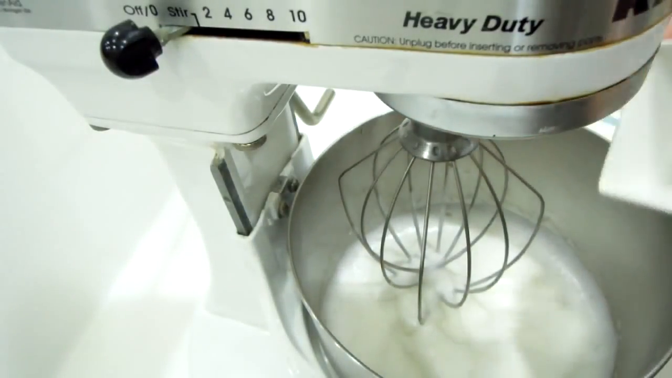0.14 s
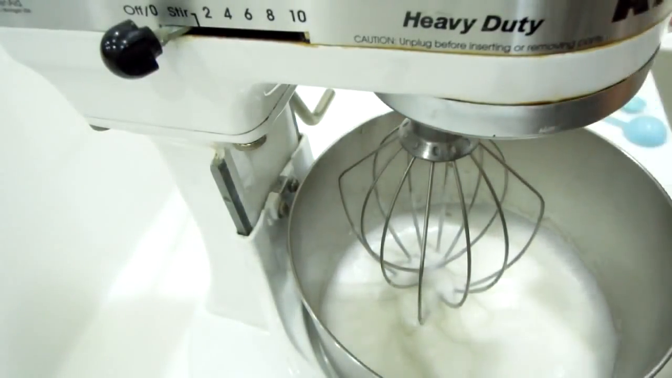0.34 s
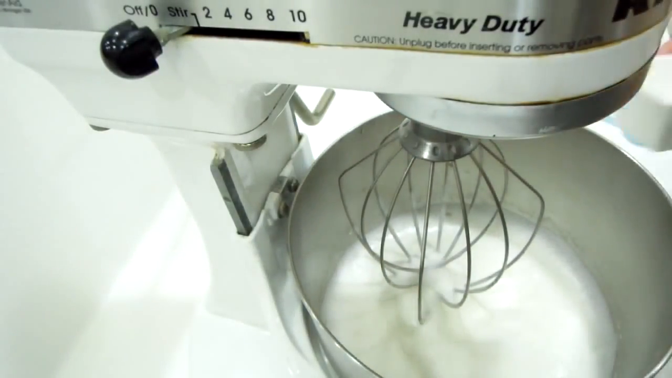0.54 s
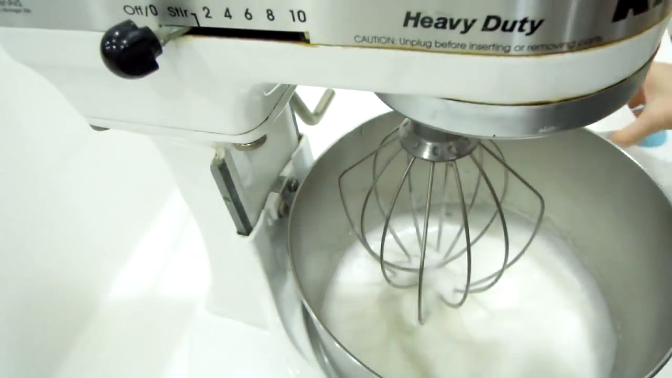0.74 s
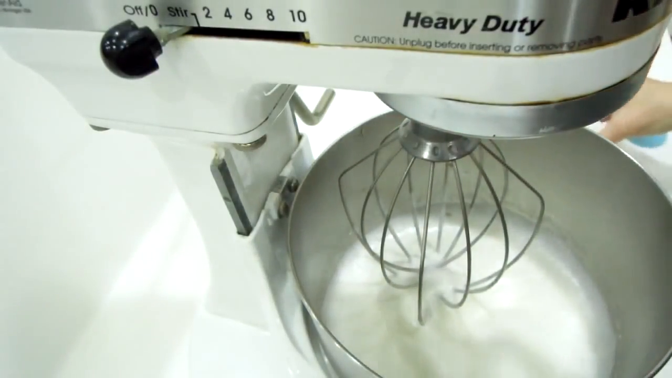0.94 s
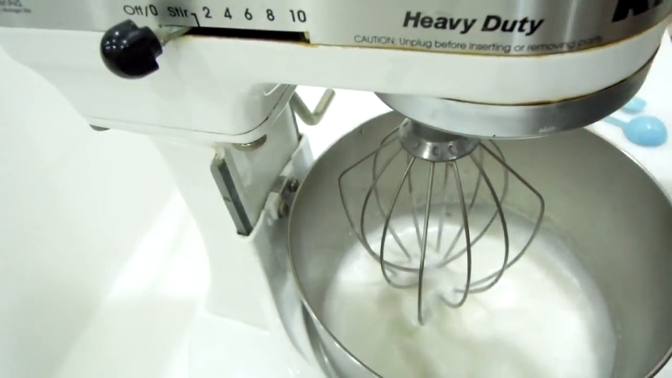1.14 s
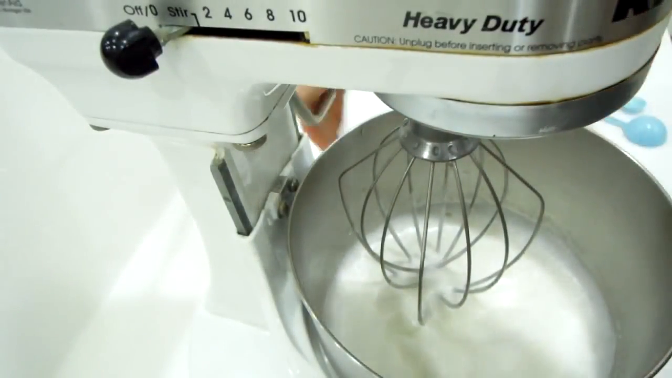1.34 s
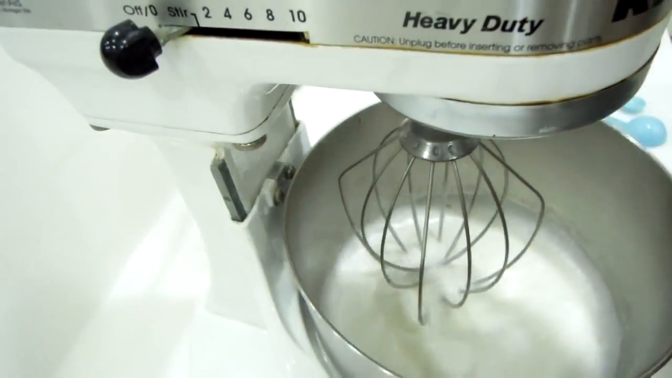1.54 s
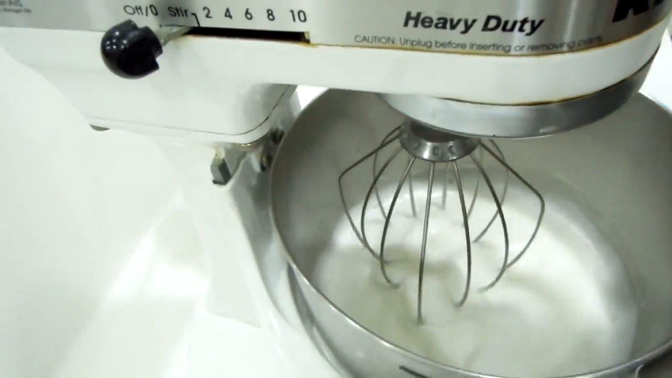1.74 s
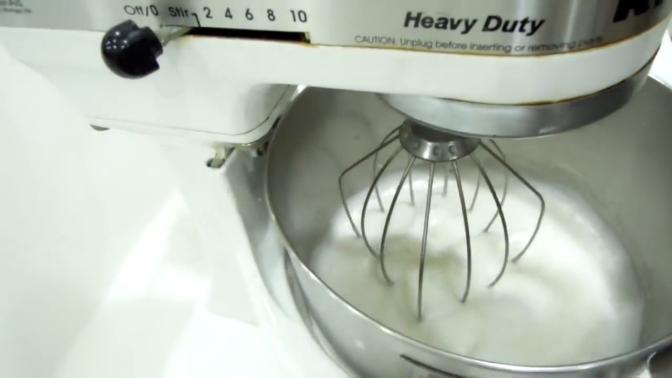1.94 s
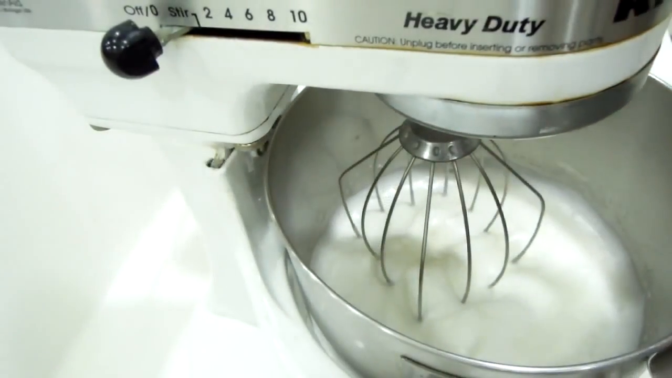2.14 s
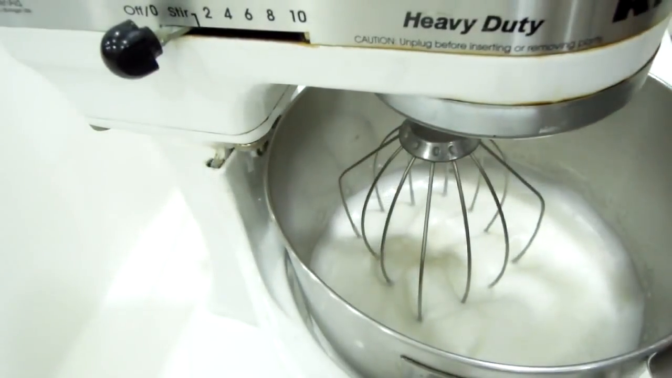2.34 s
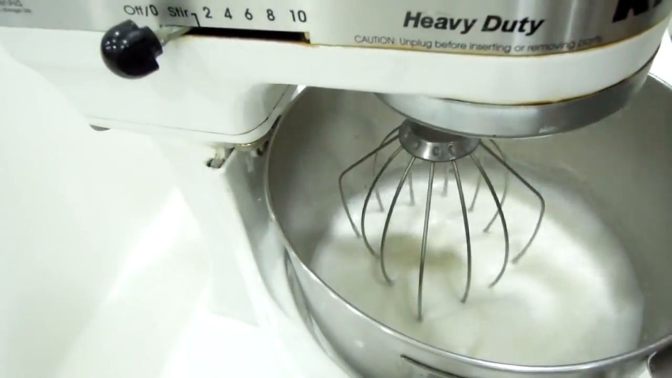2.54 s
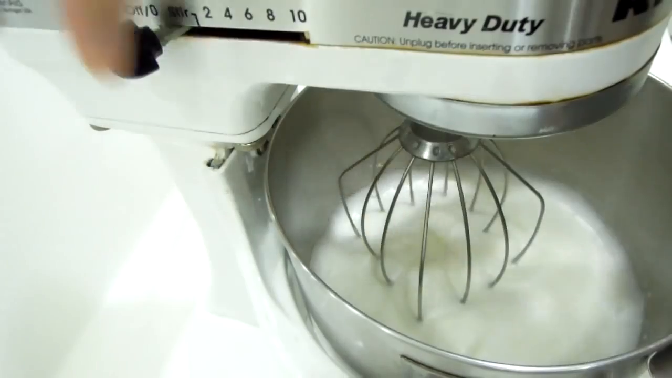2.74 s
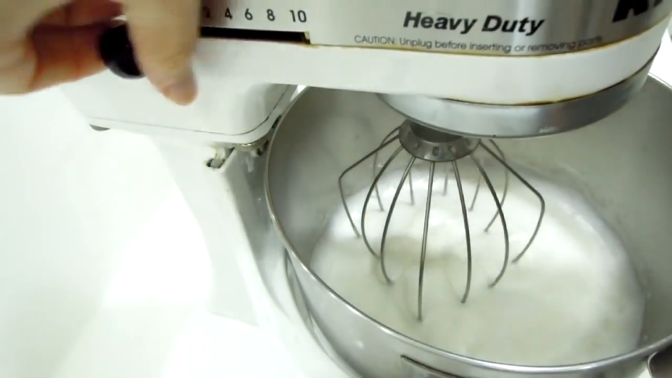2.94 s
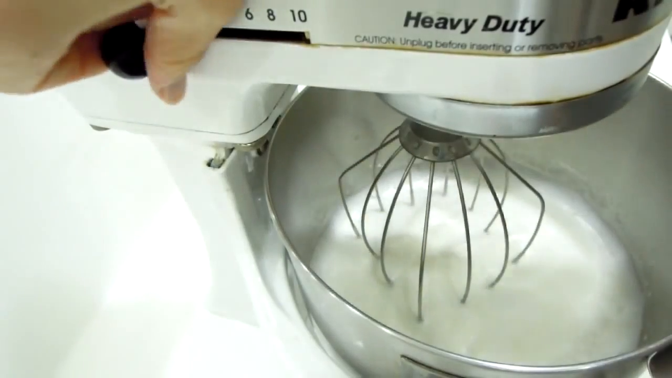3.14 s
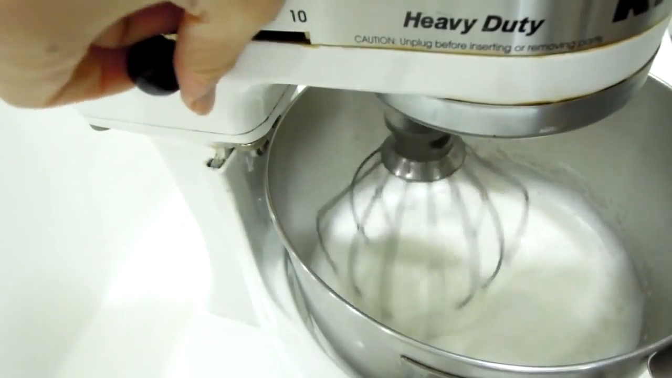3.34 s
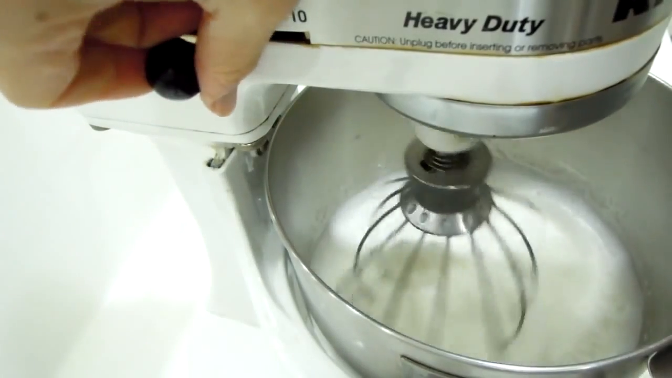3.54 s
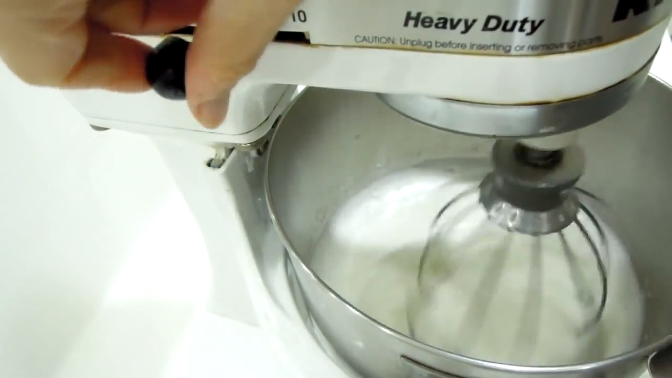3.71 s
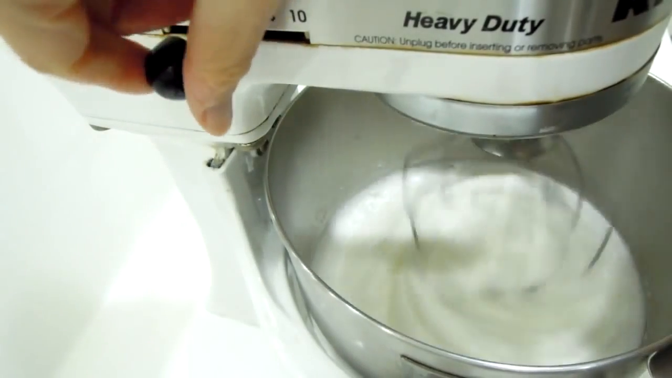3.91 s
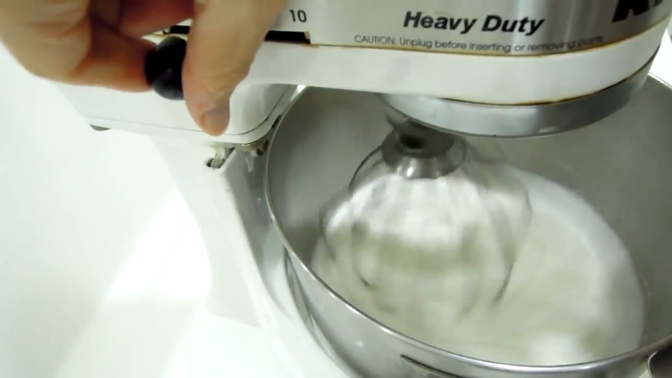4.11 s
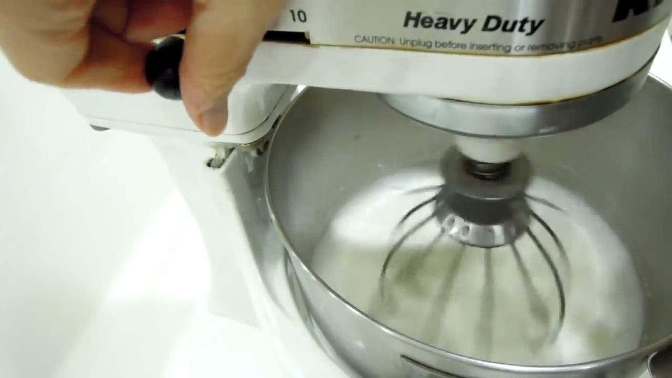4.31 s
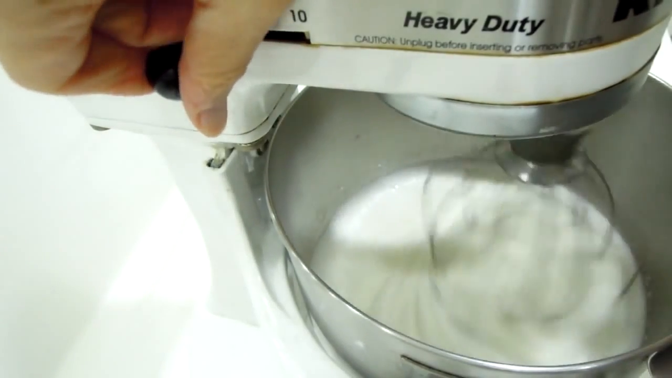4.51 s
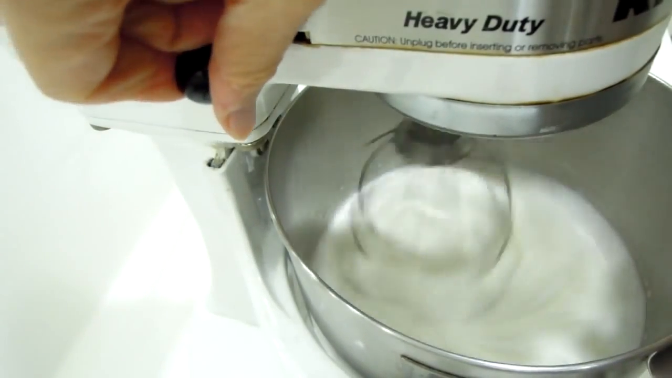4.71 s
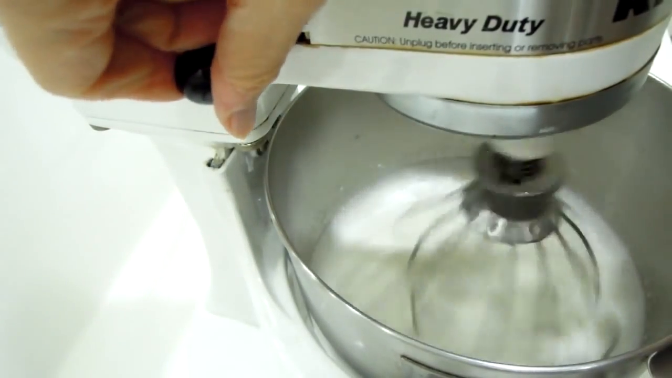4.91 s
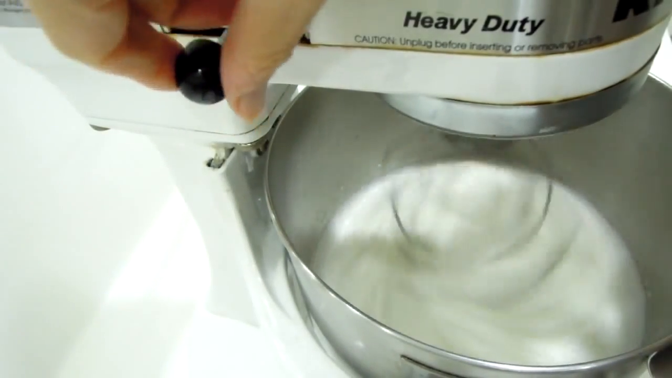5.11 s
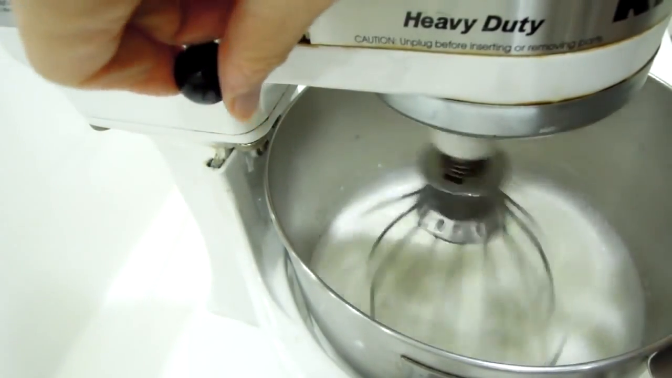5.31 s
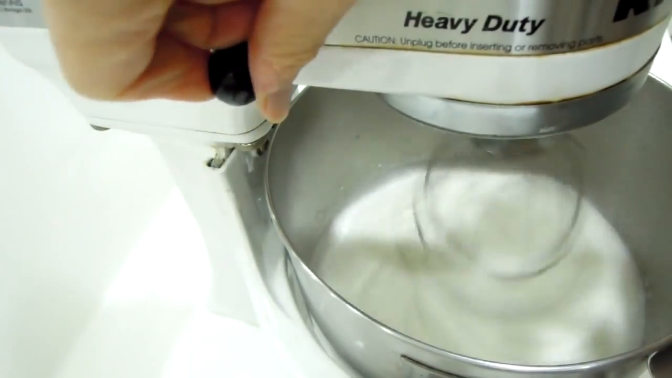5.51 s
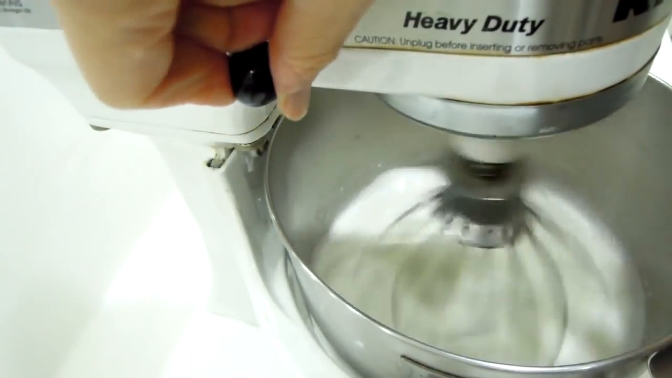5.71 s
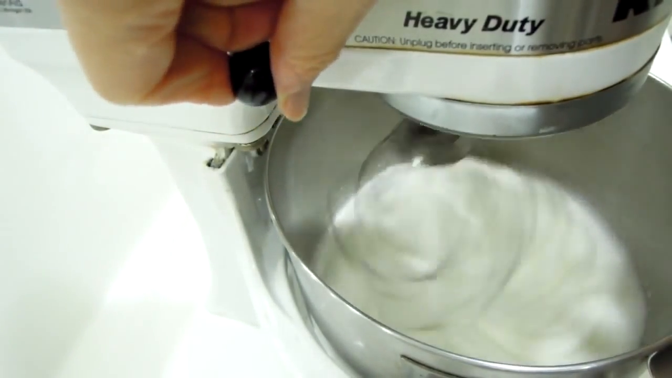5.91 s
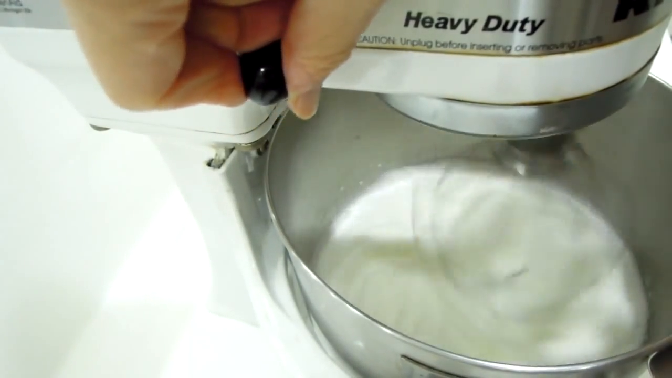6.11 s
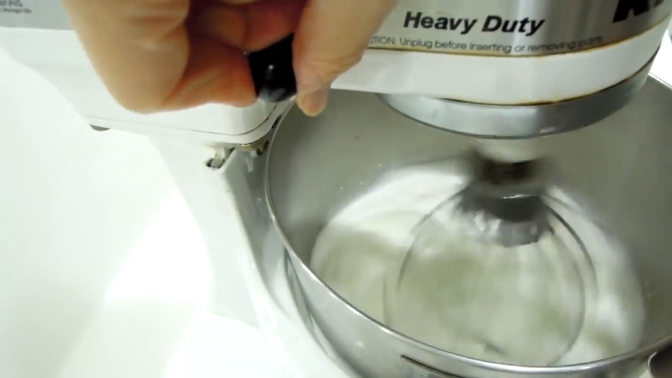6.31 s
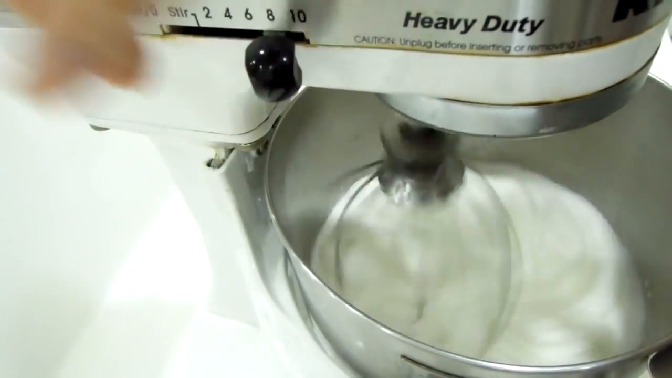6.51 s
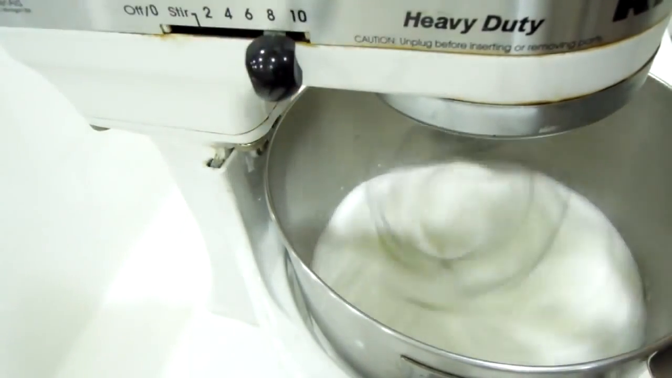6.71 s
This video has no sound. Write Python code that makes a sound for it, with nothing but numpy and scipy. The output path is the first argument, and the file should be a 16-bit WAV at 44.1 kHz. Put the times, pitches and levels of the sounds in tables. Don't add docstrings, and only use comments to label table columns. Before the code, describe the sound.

In a small kitchen with faint hiss and fridge hum, tiny ticks precede a metal utensil clacking down and ringing. A bowl lift scrapes, squeaks and knocks hard, then clamps and seats with a heavy thud. Rustling, latch clicks, light taps and a knob click follow. The mixer lurches on, gear rattle and electric whine climbing in steps to a steady top speed. Close stereo microphone, short room echo.

```python
import sys
import numpy as np
from scipy import signal
from scipy.fft import rfft, irfft
from scipy.io import wavfile
from scipy.ndimage import uniform_filter1d

SR = 44100
rng = np.random.default_rng(int(sys.argv[2]) if len(sys.argv) > 2 else 0)


def voltage_ratio(decibels):
    exponent = np.asarray(decibels, float) / 20
    return 10 ** exponent


def unload_audio(sound):
    columns = np.transpose(np.atleast_2d(sound))
    steps = np.round(np.clip(columns, -1, 1) * 32767)
    wavfile.write(sys.argv[1], SR, steps.astype(np.int16))


N = 302526
T = np.arange(N) / SR

# (pitch [Hz], level per Hz [dB])
AIR_COLOUR = [(12, -43), (20, -2.5), (108, -1.5), (143, -7.5), (178, -0.5), (263, -7.5), (286, -8),
              (470, -6), (603, -8.5), (713, -10), (1170, -14), (13800, -27), (15000, -24)]
# (pitch [Hz], level [dB])
FRIDGE_HUM = [
    (177.6, -59),
    (296.1, -58),
    (414.5, -65),
    (473.7, -56.5),
    (710.6, -54),
    (829.0, -66),
]
# (pitch [Hz], time to fall 60 dB [s])
KITCHEN_ECHO = [(150, 0.53), (500, 0.44), (2000, 0.55), (4000, 0.37), (8000, 0.3), (13000, 0.31)]
# (pitch [Hz], level per Hz [dB])
CRACK_COLOUR = [(300, -38), (2500, 7), (8000, -8), (14000, 2)]

# (time [s], peak [dB], blow length [ms], ring [dB], bass [dB])
TICKS = [
    (0.2019, -34, 12, -1, -3),
    (0.4294, -35, 13, -12, -3),
    (0.6265, -37, 12, -12, -3),
    (0.6644, -37, 13, -12, 0),
    (0.8849, -31.5, 24, -8, 3),
    (3.1766, -31, 14, -2, -3),
]
# (pitch [Hz], level per Hz [dB])
TICK_COLOUR = [(2000, -14), (4000, -3), (8000, -3), (13000, -0.5), (15000, 9)]
# (pitch [Hz], level [dB], time to fall 60 dB [s])
TICK_RING = [(7340, -7, .04), (7500, -4, .03), (10300, -16, .04)]

# (time [s], peak [dB], blow length [ms], ring [dB], bass [dB])
UTENSIL = [
    (0.9705, -22, 2, -45, -4),
    (1.063, -1.5, 4, -25, 12),
    (1.162, -15, 14, -29, 20),
    (1.177, -3.5, 4, -9.5, 3),
]
# (pitch [Hz], level per Hz [dB])
UTENSIL_COLOUR = [(47, -66), (80, -2), (325, -21.5), (574, -3.5), (800, -8.5), (2040, -2.5), (3300, -13),
                  (5130, -18), (5600, -18), (6970, -24), (12600, -43), (15000, -56)]
# (pitch [Hz], level [dB], time to fall 60 dB [s])
UTENSIL_RING = [(5556, -13, 0.45), (5642, -7, 0.3), (5650, -20, 0.6), (6640, -23, 0.22), (6660, -20, 0.34),
                (11000, -44, 0.27), (12260, -32, 0.22), (12480, -36, 0.18), (13060, -35, 0.18),
                (13680, -34, .25)]
# (pitch [Hz], width [Hz], lift [dB])
UTENSIL_BODY = [(392.6, 21, 19), (1040, 100, 4), (1550, 69, 1), (2050, 30, 7.5), (3000, 200, 6.5),
                (3350, 180, 8), (4000, 400, -0.5)]

# (time [s], peak [dB], blow length [ms], ring [dB], bass [dB])
LIFT = [
    (1.557, -27.5, 20, -39, 0),
    (1.612, -36, 9.5, -27, 8),
    (1.634, -29, 28, -19, 26),
    (1.69, -31, 26, -17, -12),
    (1.7895, 4.5, 13.6, -3, 7),
]
# (time [s], peak [dB], blow length [ms], ring [dB], bass [dB])
CLAMP = [
    (1.949, -4.5, 19.9, 12.5, 11.4),
]
# (time [s], peak [dB], blow length [ms], ring [dB], bass [dB])
SEAT = [
    (2.0697, 6, 5.45, -1, -1),
]
# (pitch [Hz], level per Hz [dB])
LIFT_COLOUR = [(24, -48), (40, -40), (145, -6), (233, -24.5), (382, -11), (824, -14.5), (1170, -12.5),
               (1390, -17.5), (6620, -14.5), (13300, -35), (15000, -11)]
# (pitch [Hz], level [dB], time to fall 60 dB [s])
LIFT_RING = [(141, -22, 0.2), (156.3, -49, 0.32), (180, -40, 0.11), (382, -28.5, 0.075)]
# (pitch [Hz], width [Hz], lift [dB])
LIFT_BODY = [(380, 75, 2.4), (1190, 120, 6), (1730, 130, 4), (2130, 150, 11), (3360, 300, 5.6),
             (3970, 270, 8.5), (4450, 230, 4.5), (7500, 260, 3.4), (8100, 170, 5.7)]
# (pitch [Hz], width [Hz], lift [dB])
CLAMP_BODY = [(740, 39, 2.2), (930, 68, 5.5), (1700, 100, 8), (2680, 140, 7.5), (3160, 120, 5),
              (3450, 230, 8), (4650, 240, 10), (5030, 150, 4.4), (6500, 340, 6.7)]
# (pitch [Hz], width [Hz], lift [dB])
SEAT_BODY = [(1180, 100, 3.9), (1750, 140, 7.4), (2210, 200, 11), (2500, 100, 2.3), (3300, 110, 12),
             (4140, 300, 11), (6200, 220, 2.8), (6800, 300, 6.9), (7800, 1300, 8.7)]
# (start [s], length [s], level at first [dB], level at last [dB])
SLIDES = [
    (1.605, 0.069, -32.5, -29),
    (1.686, 0.047, -23, -24),
    (1.722, 0.068, -20, -24.5),
]
# (pitch [Hz], level per Hz [dB])
SCRAPE_COLOUR = [(35, -37), (60, 1), (446, 2), (559, -5), (760, 3.5), (1170, 4.5), (1520, -7), (1790, -5.5),
                 (8000, -22.5), (10400, -52), (17600, -120)]
# (time [s], pitch [Hz], level [dB])
HIGH_SQUEAK = [
    (1.625, 8350, -64),
    (1.635, 8480, -40),
    (1.639, 8510, -19),
    (1.647, 8600, -16.5),
    (1.656, 8620, -25),
    (1.663, 8650, -26),
    (1.69, 8640, -35),
]
# (time [s], pitch [Hz], level [dB])
MID_SQUEAK = [
    (1.695, 5375, -53),
    (1.705, 5340, -43),
    (1.715, 5360, -43),
    (1.735, 5360, -54),
]
# (time [s], pitch [Hz], level [dB])
LOW_SQUEAK = [
    (2.32, 1177, -75),
    (2.348, 1187, -56),
    (2.374, 1088, -37.5),
    (2.418, 1089, -31.5),
    (2.435, 1070, -40),
]
# (multiple of the pitch, level [dB])
LOW_OVERTONES = [(1, -1), (2, -20), (3, -28), (4, -31), (5, -28), (7, -29)]
# (time [s], pitch [Hz], level [dB], time to fall 60 dB [s])
THUDS = [
    (1.628, 45, -28, 0.13),
    (1.791, 75, -29, 0.11),
    (2.075, 60.4, -23, 0.16),
    (2.53, 95, -40, .15),
]

# (start [s], length [s], level at first [dB], level at last [dB])
RUSTLES = [
    (2.09, 0.34, -38, -50),
    (2.485, 0.37, -38, -57),
    (2.9, 0.14, -40, -48),
    (3.18, .06, -58, -65),
]
# (pitch [Hz], level per Hz [dB])
RUSTLE_COLOUR = [(800, -6.5), (1800, -15), (3000, -7), (5000, -13), (7500, -7), (9000, -16), (13500, -17),
                 (15000, -36)]
# (time [s], peak [dB], blow length [ms], ring [dB], bass [dB])
LATCH = [
    (2.4274, -10.5, 11, -34, -17),
    (2.4385, -14, 4.4, -22, -4),
    (2.4723, -11.5, 6.7, -23, -12),
    (2.484, -16.5, 11, -16, 4),
    (2.518, -21, 5.5, -22, 7),
    (2.5294, -20, 3.7, -15, 36),
]
# (pitch [Hz], level per Hz [dB])
LATCH_COLOUR = [(290, -63), (500, -30), (619, -20), (1170, -5), (1430, -18), (1630, 3.5), (2100, -7),
                (7580, -14.5), (13200, -29), (15000, -35)]
# (pitch [Hz], level [dB], time to fall 60 dB [s])
LATCH_RING = [(1610, -4, 0.068), (1700, -12, 0.042), (1900, -6, 0.082), (2850, -6, 0.27), (3080, 1, 0.083),
              (4160, -7, .04), (8100, -9, .03)]
# (pitch [Hz], width [Hz], lift [dB])
LATCH_BODY = [(1180, 79, 7.8), (1860, 79, 4.4), (2860, 86, 9), (3070, 120, 6.3), (4130, 96, 13),
              (5200, 230, 8.1), (5600, 110, 4.7), (6770, 250, 8.7), (6900, 150, 4), (7700, 290, 14),
              (9000, 200, 6)]
# (time [s], peak [dB], blow length [ms], ring [dB], bass [dB])
NAILS = [
    (2.8948, -28, 1, -42, -10),
    (3.006, -28, 1, -40, -10),
    (3.1178, -22, 1, -40, -10),
]
# (time [s], peak [dB], blow length [ms], ring [dB], bass [dB])
KNOB = [
    (3.0535, -16, 2.2, -9.5, 11),
    (3.0674, -18, 2.8, -16, -10),
    (3.0725, -28, 3, -4, 12),
]
# (pitch [Hz], level per Hz [dB])
KNOB_COLOUR = [(710, -44), (1200, -13), (3270, -7), (3880, -3), (4790, -11), (6310, -7), (12500, -14),
               (15000, -26)]
# (pitch [Hz], level [dB], time to fall 60 dB [s])
KNOB_RING = [(2280, 3, 0.017), (3930, -1, 0.018), (6300, -10, 0.02)]
# (pitch [Hz], width [Hz], lift [dB])
KNOB_BODY = [(2250, 350, 11), (3880, 300, 9), (6160, 350, 11), (9100, 450, 11)]

# (time [s], peak [dB], blow length [ms], ring [dB], bass [dB])
LURCH = [
    (3.3805, -20, 4, 0, 0),
]
# (pitch [Hz], level [dB], time to fall 60 dB [s])
LURCH_RING = [(810, -4, 0.79), (480, -34, .2), (1560, -11, .15)]
# (time [s], turns per second [1/s])
MOTOR_SPEED = [(3.38, 22.73), (3.7, 54.36), (4.0, 69.7), (4.65, 70.09), (4.76, 72.4), (4.802, 86.8),
               (4.86, 91.6), (4.9, 97.9), (5.3, 104.7), (5.632, 108.7), (5.68, 120.8), (5.75, 132.67),
               (5.93, 150.6), (6.02, 158.34), (6.2, 158.93), (6.5, 175.98), (6.7, 177.8), (6.86, 175.1)]
# (time [s], level [dB], length [s])
JOLTS = [(3.383, 3.5, 0.0083), (3.412, 4.5, 0.031), (3.48, 2, 0.005), (3.676, 2.5, 0.015),
         (3.802, 3.5, 0.0063), (3.884, 3, 0.011), (4.016, 3, 0.0095), (4.176, 5, 0.0037),
         (4.241, 2.5, 0.0064), (4.338, 3, 0.0043), (4.79, 4, 0.024), (4.868, 3, 0.044), (5.086, -2, .004),
         (5.207, 4.5, .004), (5.301, 0.5, .004), (5.397, 3.5, 0.0043), (5.654, 0.5, 0.036),
         (5.768, 3.5, 0.017), (5.81, 2, 0.0034), (5.91, 2, 0.012), (6.042, 3.5, 0.0044),
         (6.355, -0.5, 0.0034), (6.529, 3, 0.0046), (6.736, 2.5, 0.0042)]

# (level at 100 turns per s [dB],
# change per doubling of speed [dB], bend [dB], change under full load [dB], share of a jolt [ratio])
ROAR_LAW = (-18.5, -0.45, -1.5, 0, 1.5)
FIZZ_LAW = (-21.5, 7, 1.5, -0.4, 1)
GROWL_LAW = (-25, -4, 2.5, -1, -1.5)
WHINE_LAW = (-35, 1, -3, 5.5, 1.6)
SECOND_LAW = (-45.5, 1, -3, 8, 0.3)
UPPER_LAW = (-42, 1.5, -6, 2.5, 0.1)
SHAFT_LAW = (-43.5, 10.5, -8.5, 1.5, 0)
MESH_LAW = (-37.5, 11.5, -3.5, 0.5, -8)
BUZZ_LAW = (-39, -4, -2, 2, 0.1)

# (pitch [Hz], level per Hz [dB])
ROAR_COLOUR = [(53, -56), (90, -17), (188, -12.5), (336, -6), (478, -4), (611, -2.5), (656, -13.5),
               (824, 2), (1020, -7), (1090, 3), (1320, -3), (2090, 1), (6000, -25.5), (7800, -53),
               (13200, -120)]
# (pitch [Hz], level per Hz [dB])
FIZZ_COLOUR = [(1760, -10.5), (3000, 1), (5320, -6.5), (6550, -4), (8290, -10.5), (9110, -10.5),
               (13700, -17.5), (14600, -10), (15000, -84)]
# (pitch [Hz], level per Hz [dB])
GROWL_COLOUR = [(250, -34), (380, -1), (480, 10), (600, -5), (700, -16), (900, -42)]
# (pitch [Hz], width [Hz], lift [dB])
CLANG = [(1140, 40, 31), (2070, 45, 33)]
# (pitch [Hz], width [Hz], lift [dB])
HOUSING = [(190, 17, 11.5), (314, 5.2, 9), (474.7, 15, 7.5), (565, 110, 4), (757, 234, 6), (1155, 42, 2.5),
           (1570, 380, 3), (2082, 54, 4), (2310, 180, 2), (2645, 60, 5), (2820, 130, 2), (3120, 14, 4),
           (3800, 120, 3.5), (6520, 170, 1.5)]
# (pitch [Hz], level [dB])
RADIATES = [(250, -3.5), (500, -15), (1000, -7.5), (2200, -1.5), (3500, -1.5), (4700, 0.5), (5800, 1),
            (7700, -0.5), (9300, 6.5), (10500, -6), (12000, 0), (13000, -28)]
# (multiple of the slot rate, level [dB])
SLOT_TONES = [(2, -1), (3, 1.5), (4, -1.5), (5, -3), (6, -2.5), (7, -10)]
# (multiple of the slot rate, level [dB])
SIDE_TONES = [(1, -3), (2, -19)]
# (pitch [Hz], width [Hz], lift [dB])
STATOR = [(1140, 70, 13), (1437, 250, 6.5), (1644, 210, 7), (2180, 380, -1.5), (2570, 260, 9),
          (2910, 210, 3), (3140, 110, 10), (3880, 88, 2)]
# (pitch [Hz], width [Hz], lift [dB])
STATOR_HIGH = [(2900, 300, 2), (3650, 500, 10), (4700, 300, 1), (5800, 500, 8), (6700, 300, 4),
               (7760, 200, 11)]
SHAFT_ORDERS = [3, 5, 7, 8, 11, 12, 13, 14, 15, 16, 18, 20]
SHAFT_DB = [-2.5, -10, 2.5, 7.5, 5, 8, 2.5, 6.5, 5, -3, 7, 6.5]
MESH_ORDERS = (9, 10)
# (pitch [Hz], width [Hz], lift [dB])
GEARBOX = [(1074, 44, 15.5), (1188, 113, 20), (1421, 100, 9.5), (1576, 66, 5.5), (1726, 72, 7)]
# (multiple of the mains pulse, level [dB])
BUZZ = [(3, -14), (4, -3), (5, 1), (6, -8), (7, -1), (8, 3), (9, -6), (10, -9), (11, -12), (13, -13),
        (17, -12)]
# (turns per second [1/s], level [dB])
WOBBLE = [(70, -49), (100, -47.5), (125, -46), (150, -34.5), (163, -27), (172, -44.5), (180, -41)]

# (pitch [Hz], likeness [0 to 1])
SAME = [(30, .993), (70, .988), (140, 0.997), (300, 0.995), (600, 0.988), (1200, 0.99), (2350, 0.96),
        (5870, 0.81), (9000, 0.52), (14700, 0.22)]
# (pitch [Hz], left minus right [dB])
LEAN = [(60, -1.6), (380, -1.55), (700, -1.4), (1400, -.35), (2800, -0.8), (5600, 1), (9000, .6),
        (14700, .8)]

MAINS_HZ, SLOTS = 120.2, 22
EDGE_HZ = 14250


def evened(x):
    return x / np.sqrt(np.mean(x ** 2) + 1e-20)


def read(points, hz):
    f, value = np.transpose(points)
    return np.interp(np.log(hz + 1), np.log(f + 1), value)


def lifted(points, peaks, hz):
    return read(points, hz) + sum(lift / (1 + (2 * (hz - f) / w) ** 2) for f, w, lift in peaks)


def colour(x, points, peaks=()):
    hz = np.fft.rfftfreq(len(x), 1 / SR)
    return irfft(rfft(x) * voltage_ratio(lifted(points, peaks, hz)), len(x))


def hiss(points, peaks=(), strength=1.0):
    return evened(colour(strength * rng.standard_normal(N), points, peaks))


def drift(hz, at=T):
    knots = np.arange(0, T[-1] + .01, .002)
    pole = np.exp(-2 * np.pi * hz * knots[1])
    wander = signal.lfilter([1], np.poly([pole, pole / 2]), rng.standard_normal(len(knots)))
    return np.interp(at, knots, evened(wander))


def kitchen_air(loud):
    hum = 0
    for hz, db in FRIDGE_HUM:
        hum += voltage_ratio(db + 2.2 * drift(hz=6.3)) * np.sqrt(2) * np.sin(2 * np.pi * hz * T)
    air = voltage_ratio(-47.0) * hiss(AIR_COLOUR) + hum
    loud_db = 10 * np.log10(abs(uniform_filter1d(loud ** 2, 400)) + 1e-12)
    fall = 19.3 * T
    over_db = np.maximum(np.maximum.accumulate(loud_db + fall) - fall + 23.5, 0)
    return air / voltage_ratio(0.85 * over_db)


def knock(rows, tone, ring, rattle_db, rattle_ms, body=(), crack_db=-40, swell_ms=3.4, rise_ms=3.0):
    out, t = np.zeros(N + SR), np.arange(SR // 2) / SR
    hz = np.fft.rfftfreq(len(t), 1 / SR)
    for s, db, ms, ring_db, bass_db in rows:
        blow_colour = voltage_ratio(lifted(tone, body, hz) + bass_db / (1 + (hz / 1800) ** 2))
        noise = evened(irfft(rfft(rng.standard_normal(len(t))) * blow_colour))
        grains = evened(uniform_filter1d(rng.standard_normal(len(t)), 150))
        rattle = voltage_ratio(rattle_db + 2.7 * np.minimum(grains, 1.8)) * np.exp(-1000 * t / rattle_ms)
        blow = 0.47 * noise * (np.exp(-1000 * t / max(ms, .5)) + rattle)
        swell = np.minimum(1000 * t / swell_ms, 1)
        for f, mode_db, t60 in ring:
            blow += voltage_ratio(ring_db + mode_db - 60 * t / t60) * np.sin(2 * np.pi * f * t) * swell
        crack = voltage_ratio(crack_db) * evened(colour(rng.standard_normal(512), CRACK_COLOUR))
        crack *= np.exp(-1000 * t[:512] / 0.64)
        start = round(s * SR)
        out[start:][:len(t)] += voltage_ratio(db) * blow * np.minimum(1000 * t / rise_ms, 1)
        out[start:][:512] += voltage_ratio(db) * crack
    return out[:N]


def echo_taps(t60s, first):
    taps = np.zeros(SR)
    at = np.arange(first, SR - 20, 20)
    taps[at + rng.integers(0, 20, len(at))] = rng.choice([-1., 1.], len(at))
    hz, t, z = signal.stft(taps, SR, nperseg=128)
    out = signal.istft(z * voltage_ratio(-60 * t / read(t60s, hz)[:, None]), SR, nperseg=128)[1]
    return out / np.linalg.norm(out)


def faint_ticks():
    return knock(TICKS, TICK_COLOUR, TICK_RING, rattle_db=-7, rattle_ms=40.0)


def utensil():
    blows = knock(UTENSIL, UTENSIL_COLOUR, UTENSIL_RING, rattle_db=-10.5, rattle_ms=45.6,
                  body=UTENSIL_BODY, crack_db=-20, swell_ms=14.0, rise_ms=1.0)
    return colour(blows, [(40, -19), (110, -14.0), (150, 3.0)])


def bowl_lift():
    out = knock(LIFT, LIFT_COLOUR, LIFT_RING, rattle_db=-43, rattle_ms=10.0, body=LIFT_BODY, crack_db=-9.5)
    out += knock(CLAMP, LIFT_COLOUR, LIFT_RING, rattle_db=-37, rattle_ms=30., body=CLAMP_BODY, crack_db=-18)
    bright_seat = [*SEAT_BODY, (12000, 4600, 12)]
    out += knock(SEAT, LIFT_COLOUR, LIFT_RING, rattle_db=-29, rattle_ms=30., body=bright_seat, crack_db=-15.5)
    return out


def slide(strokes, tone):
    grit = hiss(tone, strength=voltage_ratio(1.9 * drift(hz=70)))
    level = 0
    for s, length, first_db, last_db in strokes:
        edge = np.clip(np.minimum(T - s, s + length - T) / 0.0075, 0, 1)
        level += voltage_ratio(np.interp(T, [s, s + length], [first_db, last_db]) - 8.0) * edge
    return grit * level


def squeak(rows, overtones):
    s, hz, db = np.transpose(rows)
    turns = np.cumsum(np.interp(T, s, hz)) / SR
    edge = np.clip(np.minimum(T - s[0], s[-1] - T) / 0.0036, 0, 1)
    wave = sum(voltage_ratio(d) * np.sin(2 * np.pi * round(k) * turns) for k, d in overtones)
    return np.sqrt(2) * voltage_ratio(np.interp(T, s, db) + 1.1 * drift(hz=40)) * edge * wave


def thuds():
    out = 0
    for s, hz, db, t60 in THUDS:
        since = np.maximum(T - s, 0)
        out += voltage_ratio(db - 60 * since / t60) * np.sin(2 * np.pi * hz * since)
    return out


def latch():
    return knock(LATCH, LATCH_COLOUR, LATCH_RING, rattle_db=-19.5, rattle_ms=77.0, body=LATCH_BODY,
                 crack_db=-9.5, rise_ms=1.1)


def nails():
    return knock(NAILS, TICK_COLOUR, (), rattle_db=-25, rattle_ms=8., crack_db=-9)


def knob():
    return knock(KNOB, KNOB_COLOUR, KNOB_RING, rattle_db=-29, rattle_ms=15., body=KNOB_BODY, crack_db=-22)


def motor_lurch():
    return knock(LURCH, KNOB_COLOUR, LURCH_RING, rattle_db=-21, rattle_ms=15.)


def tones(hz, orders, shift_hz=0., flutter_db=2.4, flutter_hz=30):
    out, turns = np.zeros(N), np.cumsum(hz) / SR
    coarse = T[::64]
    resonances = np.multiply(HOUSING, [1, 1, 1.6])
    for k, db in orders:
        f = np.round(k) * hz[::64] + shift_hz
        level_db = db + flutter_db * drift(flutter_hz, coarse) + lifted(RADIATES, resonances, f)
        level = np.interp(T, coarse, voltage_ratio(level_db) * (f < EDGE_HZ))
        out += level * np.cos(2 * np.pi * (np.round(k) * turns + shift_hz * T + rng.random()))
    return np.sqrt(2) * out


def gear_rattle(level_db, jolt_db, chopped):
    surge = 1 + 0.23 * np.cos(2 * np.pi * MAINS_HZ * T)
    hits = rng.random(N) < 60 / SR
    teeth = voltage_ratio(0.8 * np.minimum(rng.exponential(1, N), 3)) * hits
    knocks = signal.lfilter([1], [1, -np.exp(-1 / (0.0053 * SR))], teeth)
    shake = surge * (1 + 0.5 * knocks) * voltage_ratio(1.0 * drift(hz=36))
    roar = voltage_ratio(level_db(ROAR_LAW)) * hiss(ROAR_COLOUR, HOUSING, shake)
    fizz = voltage_ratio(level_db(FIZZ_LAW)) * hiss(FIZZ_COLOUR, HOUSING, shake ** 0.58)
    clang = voltage_ratio(-22) * (voltage_ratio(jolt_db) - 1) * hiss([(0, 0)], CLANG)
    growl = voltage_ratio(level_db(GROWL_LAW) - 13.5 * chopped) * hiss(GROWL_COLOUR, HOUSING, shake)
    return roar + fizz + clang + growl


def motor_song(speed, strain, level_db, chopped):
    slot = SLOTS * speed
    whine = tones(slot, [(1, -3.5)])
    for side in (MAINS_HZ, -MAINS_HZ):
        whine += tones(slot, SIDE_TONES, side)
    sing = voltage_ratio(level_db(WHINE_LAW) + lifted([(0, 0.0051)], STATOR, slot)) * whine
    smear_db = -6 * np.clip(strain - 2., 0, 2)
    sing += voltage_ratio(level_db(UPPER_LAW) + smear_db) * tones(slot, SLOT_TONES[1:], flutter_db=4)
    second_db = level_db(SECOND_LAW) + lifted([(0, 0)], STATOR_HIGH, 2 * slot)
    sing += voltage_ratio(second_db) * tones(slot, SLOT_TONES[:1], flutter_db=4)
    shaft = tones(speed, zip(SHAFT_ORDERS, SHAFT_DB), flutter_db=4, flutter_hz=14)
    sing += voltage_ratio(level_db(SHAFT_LAW)) * shaft
    wires_in = np.clip((T - 6.69) / 0.026, 0, 1)
    sing += voltage_ratio(-43) * wires_in * tones(50 * speed, [(1, 0)])
    for k in MESH_ORDERS:
        mesh_db = level_db(MESH_LAW) + lifted([(0, 0)], GEARBOX, k * speed)
        sing += voltage_ratio(mesh_db) * tones(k * speed, [(1, -0.51)], flutter_db=1.2)
    buzz = tones(np.full(N, MAINS_HZ), BUZZ, flutter_db=1.2)
    sing += voltage_ratio(level_db(BUZZ_LAW) + 9 * chopped) * buzz
    wobble_db = read(WOBBLE, speed) + 6.5 + 1.0 * drift(hz=3.8)
    return sing + voltage_ratio(wobble_db) * np.cos(2 * np.pi * np.cumsum(speed) / SR)


def motor():
    speed = np.interp(T, *np.transpose(MOTOR_SPEED))
    doublings = np.log2(np.maximum(speed, 16) / 100)
    gain = uniform_filter1d(np.gradient(speed) * SR, size=1600)
    load = np.clip(gain / 33, 0, 1)
    jolt_db = sum(db * np.exp(-((T - s) / length) ** 2) for s, db, length in JOLTS)

    def level_db(law):
        db, slope, bend, loaded, share = law
        return db + slope * doublings + bend * doublings ** 2 + loaded * load + share * jolt_db

    strain = uniform_filter1d(abs(np.gradient(speed)) * SR / speed, 4000)
    shudder = 0.011 * np.minimum(strain, 1) * drift(hz=51.0)
    speed = speed * (1 + 0.00137 * drift(hz=4.54) + shudder)
    speed *= 1 + .0026 * (speed / speed.max()) ** 4 * drift(hz=25.1)
    chopped = np.clip((4.025 - T) / 0.064, 0, 1)
    mix = voltage_ratio(-3.0) * gear_rattle(level_db, jolt_db, chopped) + motor_song(speed, strain, level_db, chopped)
    switched_on = np.clip((T - 3.3795) / 0.00032, 0, 1)
    return colour(mix, [(30, -8), (70, -12), (110, -4.5), (140, -0.5)]) * switched_on


def two_microphones(mid):
    hz, same = np.transpose(SAME)
    same = np.clip(same, .05, .9999)
    z = signal.stft(mid, nperseg=256, noverlap=192)[2]
    scrambled = z * np.exp(2j * np.pi * rng.random(z.T.shape).T)
    stray = signal.istft(scrambled, nperseg=256, noverlap=192)[1][:N]
    apart = colour(2 * stray, np.transpose([hz, 10 * np.log10((1 - same) / (1 + same))]))
    lean = np.array(LEAN) * [1, .5]
    return np.array([colour(mid + apart, lean), colour(mid - apart, lean * [1, -1])])


def scene():
    near = faint_ticks() + utensil() + bowl_lift()
    near += squeak(HIGH_SQUEAK, [(1, 0.11)]) + squeak(MID_SQUEAK, [(1, .1)])
    near += squeak(LOW_SQUEAK, LOW_OVERTONES) + thuds()
    near += latch() + nails() + knob() + motor_lurch()
    walls = echo_taps(KITCHEN_ECHO, first=200)
    loud = near + voltage_ratio(-8.5) * signal.oaconvolve(near, walls)[:N]
    loud += slide(SLIDES, SCRAPE_COLOUR) + slide(RUSTLES, RUSTLE_COLOUR)
    running = motor()
    loud += running + voltage_ratio(-13) * signal.oaconvolve(running, walls)[:N]
    return two_microphones(loud + kitchen_air(loud))


def band_limit(x):
    return signal.sosfilt(signal.butter(12, 15270, fs=SR, output="sos"), x)


def record(dry):
    rounded = dry / (1 + abs(dry / .97) ** 8) ** (1 / 8)
    edge = [(20, 0), (EDGE_HZ - 400, 0), (EDGE_HZ, -6), (EDGE_HZ + 120, -36), (SR / 2, -70)]
    return band_limit(np.array([colour(c, edge) for c in rounded]))


dry = scene()
out = record(dry)
unload_audio(out)
```